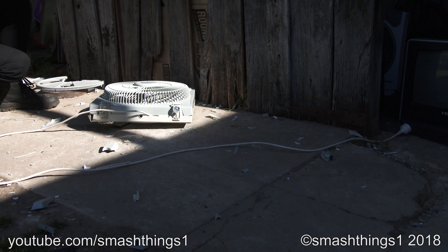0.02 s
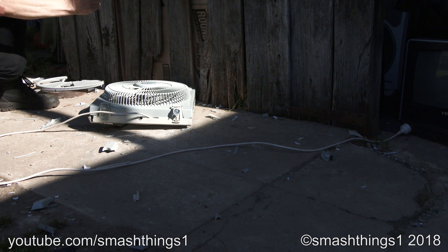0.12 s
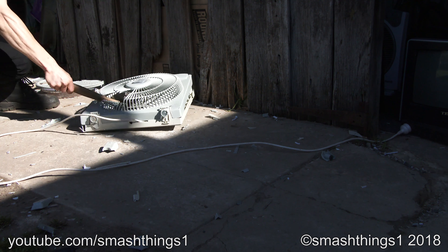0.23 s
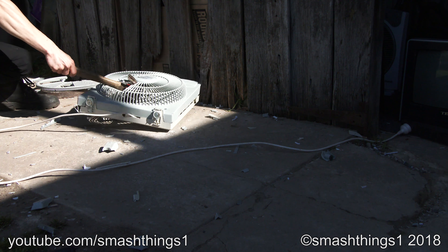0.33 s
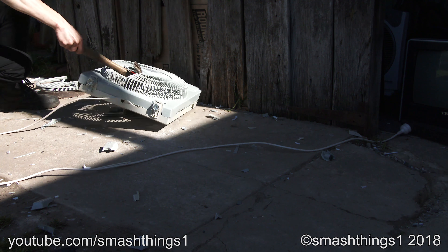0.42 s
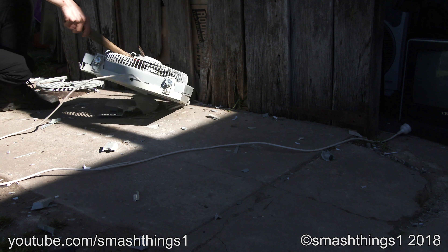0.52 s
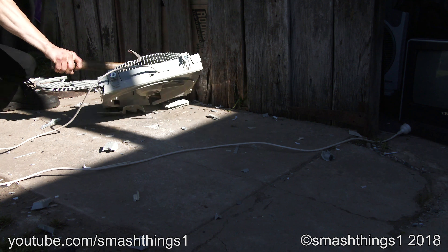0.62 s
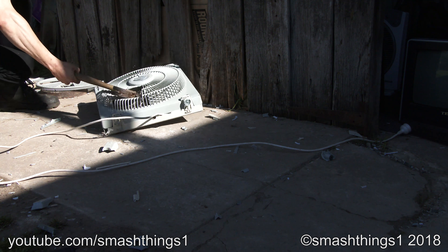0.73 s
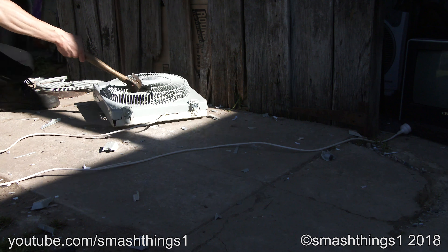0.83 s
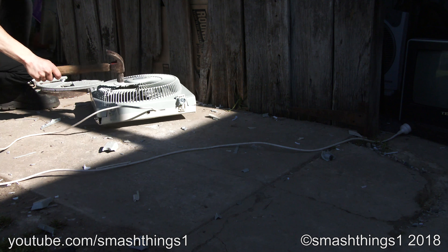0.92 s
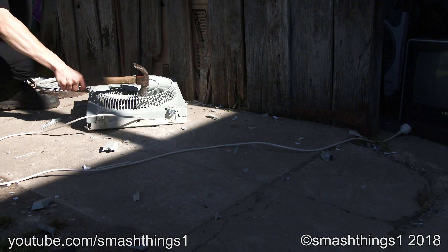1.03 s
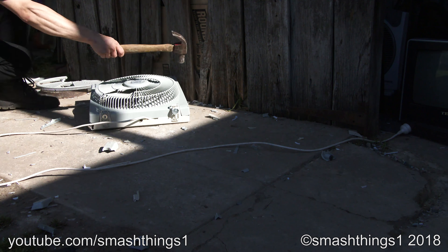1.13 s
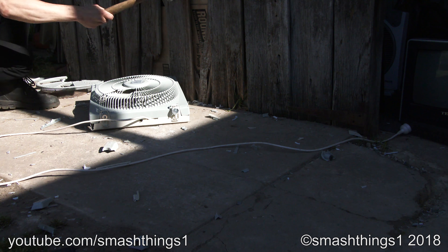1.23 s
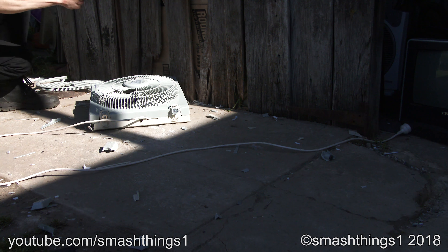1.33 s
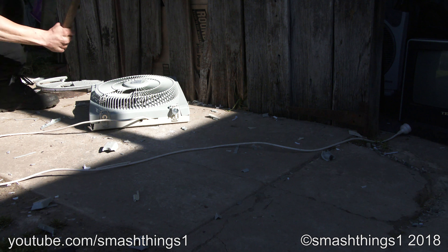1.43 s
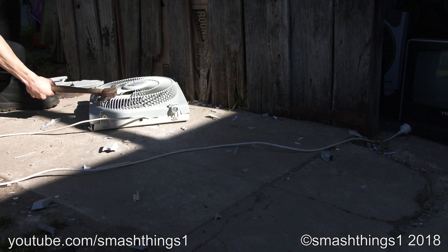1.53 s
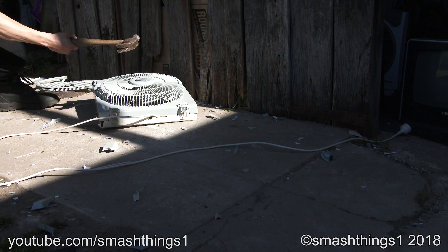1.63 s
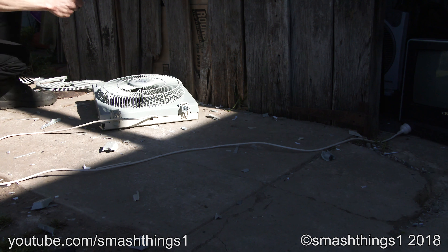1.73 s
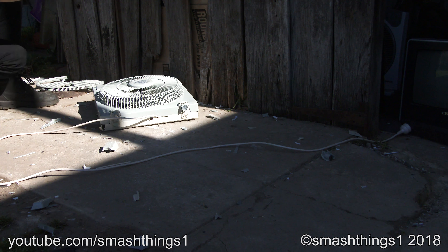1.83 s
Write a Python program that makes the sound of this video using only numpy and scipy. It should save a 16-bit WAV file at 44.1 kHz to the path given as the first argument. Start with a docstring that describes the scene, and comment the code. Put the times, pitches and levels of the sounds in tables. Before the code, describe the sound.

A hammer smashes a plastic box fan on concrete outdoors. Faint bird whistles and soft handling bumps precede a bright, splintering crack at 0.25 s. Loose grille chatters, then hard hollow knocks cluster at 0.68-0.83 s as the case drops. Rattling and lighter knocks follow around 0.9-1.2 s, then near quiet. A second, duller blow lands at 1.55 s, with clacks and ticks fading. Close microphone, short yard reflections.

```python
"""On concrete beside a wooden fence, a claw hammer smashes a plastic box fan.
The first blow cracks the grille; the fan is lifted on the hammer, drops back, and rattles as the
claw pulls free; then a second blow lands. Loose plastic ticks and chatters in between.
Enveloped noise, coloured and sent through case resonances, makes the contacts; struck panels add
short sines. Wavering sines whistle as a distant bird, and coloured noise is the outdoor air."""
import sys
import numpy as np
from scipy import signal
from scipy.fft import rfft, irfft, next_fast_len
from scipy.io import wavfile

SR = 44100
rng = np.random.default_rng(int(sys.argv[2]) if len(sys.argv) > 2 else 0)


def unload_wav(signal):
    """Save mono or channel-first audio to the path in sys.argv[1] as 16-bit WAV at rate SR, clipped to [-1, 1]."""
    wavfile.write(
        sys.argv[1],
        SR,
        np.round(np.clip(np.atleast_2d(signal).T, -1, 1) * 32767).astype(np.int16),
    )


N = 81585
TIME = np.arange(N) / SR  # seconds

ATTACK_S, GRAIN_DB = 0.00078, 4  # rise time constant of a burst; scale of uneven grain strength
SHUDDER_S, BUZZ_S = 0.024, 0.038  # decays of the shell's shudder and of the buzzing grille
SHELL_LOW_HZ = 110  # the light shell radiates little below this


def from_db(db):
    """Logarithmic level: decibels become an amplitude gain."""
    return 10 ** (np.asarray(db) / 20)


def rms_one(x):
    """Normalised power: scale to unit rms."""
    return x / np.sqrt(np.mean(x ** 2) + 1e-20)


def unit_energy(x):
    """Normalised energy: scale the sum of squares to one."""
    return x / np.sqrt(np.sum(x ** 2) + 1e-20)


def cut(x, hz, kind):
    """Second-order filtering: a gentle low- or high-pass."""
    return signal.sosfilt(signal.butter(2, min(hz, .45 * SR), kind, fs=SR, output="sos"), x)


def colour(x, spectrum):
    """Minimum-phase filtering: impose a spectrum causally; white noise keeps its level."""
    size = 2 * next_fast_len(N)
    hz, db = np.transpose(spectrum)
    bin_hz = np.arange(size // 2 + 1) * SR / size
    gain = rms_one(from_db(np.interp(np.log(bin_hz + 1), np.log(hz), db)))
    # folding the cepstrum onto positive time makes the response causal
    cepstrum = irfft(np.log(gain))[:size // 2]
    response = np.exp(2 * rfft(cepstrum, size) - cepstrum[0])
    return irfft(rfft(x, size) * response)[..., :N]


def grains():
    """Granular fracture: dense tiny breaks and slips of uneven size."""
    strength_db = GRAIN_DB * np.minimum(rng.exponential(1, N), 4)
    return rms_one(rng.standard_normal(N) * from_db(strength_db))


def even_grains():
    """Broadband excitation: noise whose strength is evened out over pitch, as in a broad impact."""
    x = rng.standard_normal(N)
    for _ in range(6):
        z = signal.stft(x, nperseg=512)[2]
        x = signal.istft(z / (np.abs(z) + 1e-12))[1][:N]
    return rms_one(x)


def bursts(times, levels_db, decays):
    """Exponential decay: bursts with a sharp attack and their own decays, summed in power."""
    power = np.zeros(N)
    for s, db, decay in np.broadcast(times, levels_db, decays):
        start = int(np.clip(s * SR, 0, N - 1))
        t = TIME[:min(N - start, SR // 2)]
        envelope = from_db(db) * (1 - np.exp(-t / ATTACK_S)) * np.exp(-t / decay)
        power[start:start + len(t)] += envelope ** 2
    return np.sqrt(power)


def contacts(times, levels_db, decays, shudder_db):
    """Two-stage decay: the force of each contact dies fast, over a weaker, longer shudder."""
    return np.hypot(bursts(times, levels_db, decays), bursts(times, levels_db + shudder_db, SHUDDER_S))


def delayed(x, s):
    """Time delay: the same sound, s seconds later."""
    return np.interp(TIME - s, TIME, x, left=0)


# spectrum of the outdoor air: frequency_hz [Hz], density_db [relative dB per Hz]
AIR_SPECTRUM = [(20, -11), (130, 5), (300, -1), (700, -8.5), (2200, -7), (5000, -15), (16000, -27.5)]
AIR_DB = -75.5


def air():
    """Partly coherent noise field: quiet outdoor background, nearly the same on both sides."""
    mid, side = colour(rng.standard_normal((2, N)), AIR_SPECTRUM)
    return from_db(AIR_DB) * (mid + .3 * side * np.array([[1], [-1]]))


# distant bird whistles: start_s [s], length_s [s], pitch_hz [Hz], level_db [dB]
BIRD_WHISTLES = [(-.02, .16, 2121, -70), (.095, .16, 3122, -72), (.12, .14, 3780, -80),
                 (.19, .09, 2326, -69), (1.23, .33, 2326, -80)]
BIRD_WAVER, BIRD_FLUTTER_DB = .007, 2  # rms share of the pitch; rms level


def bird():
    """Multipath modulation: scattered paths make soft, far whistles waver and flutter."""
    out = np.zeros(N)
    for start_s, length_s, pitch_hz, level_db in BIRD_WHISTLES:
        waver, flutter = rms_one(cut(rng.standard_normal((2, N)), 52, "low"))
        progress = np.clip((TIME - start_s) / length_s, 0, 1)
        swell = np.sqrt(np.abs(np.sin(np.pi * progress ** .5)))
        phase = 2 * np.pi * np.cumsum(pitch_hz * (1 + BIRD_WAVER * waver)) / SR
        out += from_db(level_db + BIRD_FLUTTER_DB * flutter) * swell * np.sin(phase)
    return out


FENCE_SIDE_DB, FENCE_DECAY_S, FENCE_TOP_HZ = -12.5, 0.0023, 4530  # level before the low-pass


def fence():
    """Early scattering: a short impulse response that the fence sends sideways."""
    scatter = unit_energy(even_grains() * TIME * np.exp(-TIME / FENCE_DECAY_S))
    return from_db(FENCE_SIDE_DB) * cut(scatter, FENCE_TOP_HZ, "low")


YARD_DB, YARD_T60_S, YARD_TOP_HZ = -19, 0.43, 10900  # level is for both channels together
YARD_TREBLE_DB, YARD_TREBLE_T60_S = -6, 0.48
YARD_WIDTH, PAN_DB = 0.21, 0.35  # side share of the tail; gain on the first channel, loss on the second


def yard_tail():
    """Diffuse reverberation: decaying noise with a soft onset and a weaker treble."""
    noise = rng.standard_normal((2, N))
    low = cut(noise, 3300, "low") * from_db(-60 * TIME / YARD_T60_S)
    treble = cut(noise[::-1], 2000, "high") * from_db(-60 * TIME / YARD_TREBLE_T60_S)
    tail = cut(low + from_db(YARD_TREBLE_DB) * treble, YARD_TOP_HZ, "low")
    return from_db(YARD_DB) * unit_energy(tail * (1 - np.exp(-TIME / 0.0049)))


def yard(x):
    """Convolution with impulse responses: the fence and a faint tail widen the sound."""
    tail = yard_tail()
    side_response = fence() + YARD_WIDTH * cut(tail[1], FENCE_TOP_HZ, "low")
    mid = x + signal.fftconvolve(x, tail[0])[:N]
    side = signal.fftconvolve(x, side_response)[:N]
    side = cut(cut(side, 220, "high"), 6000, "low")
    return np.array([(mid + side) * from_db(PAN_DB), (mid - side) * from_db(-PAN_DB)])


# soft handling bumps: start_s [s], level_db [dB]
HANDLING_BUMPS = [(0.042, -48), (0.145, -45.5), (0.185, -45.5)]
# spectrum of clacks and bumps: frequency_hz [Hz], density_db [relative dB per Hz]
CLACK_SPECTRUM = [(80, -35), (280, -19), (550, -2.5), (1100, -5), (1900, -8), (4000, -16.5), (12000, -31.5)]
BUMP_DECAY_S, BUMP_TOP_HZ = .008, 1950


def bumps():
    """Soft contact: handling before the first blow excites little treble, so the bumps are dull."""
    start_s, level_db = np.transpose(HANDLING_BUMPS)
    bump = colour(bursts(start_s, level_db, BUMP_DECAY_S) * even_grains(), CLACK_SPECTRUM)
    return cut(cut(bump, BUMP_TOP_HZ, "low"), BUMP_TOP_HZ, "low")


# chatter of the loose grille as the fan moves: start_s [s], level_db [dB], interpolated between rows
CHATTER_LEVELS = [(0, -72), (.23, -70.5), (.29, -39), (.40, -56.5), (.47, -60.5), (.56, -67.5),
                  (.65, -57.5), (.80, -97), (.92, -55), (.99, -61.5), (1.09, -34), (1.19, -80.5),
                  (1.34, -88), (1.54, -88.5), (1.62, -74), (1.75, -49.5), (1.80, -71.5), (1.85, -59)]
CHATTER_PER_S = 500  # mean rate of taps


def chatter():
    """Random impulse train: small taps of the loose grille with chance times, signs and sizes."""
    hits = rng.random(N) < CHATTER_PER_S / SR
    strength_db = 0.93 * np.minimum(rng.exponential(1, N), 3)
    taps = hits * rng.choice([-1, 1], N) * from_db(strength_db)
    return rms_one(taps) * from_db(np.interp(TIME, *np.transpose(CHATTER_LEVELS)))


# loose plastic clacks: start_s [s], body_db [dB], tick_db [dB]
LOOSE_CLACKS = [(.061, -56, -67.5), (0.309, -33.5, -51), (0.363, -37, -44.5), (0.392, -53.5, -35.5),
                (0.398, -38.5, -30.5), (0.411, -37, -43), (0.469, -67, -58), (0.5, -53, -54),
                (0.594, -49, -62), (0.613, -44.5, -70), (0.634, -38.5, -46), (0.666, -40.5, -50),
                (0.721, -31, -44), (0.924, -56, -43.5), (0.951, -41.5, -56), (0.998, -61, -44),
                (1.023, -40.5, -39), (1.054, -55, -38.5), (1.068, -41, -42), (1.105, -35, -57),
                (1.141, -39.5, -38), (1.173, -42, -65), (1.224, -48.5, -71), (1.297, -57.5, -62.5),
                (1.38, -86.5, -69), (1.472, -78, -67), (1.592, -27, -45), (1.654, -66, -43),
                (1.764, -40.5, -63), (1.767, -63.5, -45), (1.831, -61, -50)]
# spectrum of the plastic tick: frequency_hz [Hz], density_db [relative dB per Hz]
TICK_SPECTRUM = [(60, -39), (500, -14.5), (3500, 2), (8000, -2.5), (16000, -13.5)]
CLACK_DECAY_S, TICK_DECAY_S = 0.0061, 0.0068
TICK_BUZZ_DB, CHATTER_CRACK_DB = -22.5, -14  # buzz relative to the tick; share of chatter heard as ticks


def rattle():
    """Repeated light impact: clacks, each a small body sound and a tick, over random chatter."""
    start_s, body_db, tick_db = np.transpose(LOOSE_CLACKS)
    loose = chatter()
    body = contacts(start_s, body_db, CLACK_DECAY_S, shudder_db=-13.5) * even_grains() + loose
    tick_force = bursts(start_s, tick_db, TICK_DECAY_S)
    tick_buzz = bursts(start_s, tick_db + TICK_BUZZ_DB, BUZZ_S)
    tick = np.hypot(tick_force, tick_buzz) * grains()
    return colour(body, CLACK_SPECTRUM) + colour(tick + from_db(CHATTER_CRACK_DB) * loose, TICK_SPECTRUM)


# spectra of the hollow case, its hard walls and the low thud:
# frequency_hz [Hz], density_db [relative dB per Hz]
BOOM_SPECTRUM = [(40, -35), (300, -10.5), (480, -2), (680, -1.5), (900, -2), (1400, -11), (4000, -47.5)]
KNOCK_SPECTRUM = [(40, -55.5), (400, -17.5), (750, -3), (1150, 0.5), (1650, -1.5), (2400, -5.5),
                  (4000, -13.5), (16000, -53)]
THUD_SPECTRUM = [(20, -10.5), (70, -3.5), (220, 3.5), (400, -14), (2000, -45.5)]
PANEL_RING_S, PANEL_BOOM_DB = 0.0065, -5  # decay of a struck panel; boom relative to the panel
SHUDDER_DB = -16.5  # relative to the knock
REBOUND_SHARE = .7  # the case slaps back with this share of the force


def shell(rows, thud_db, rebound_s=None):
    """Impact radiation: a hollow boom, a hard knock and a thud; a rebound repeats the force."""
    start_s, panel_db, _, knock_db, _, decay_s = np.transpose(rows)
    force = [even_grains(), even_grains()]
    if rebound_s:
        force = [rms_one(f + REBOUND_SHARE * delayed(f, rebound_s)) for f in force]
    boom_force = contacts(start_s, panel_db + PANEL_BOOM_DB, decay_s, shudder_db=-13) * force[0]
    knock_force = contacts(start_s, knock_db, decay_s, SHUDDER_DB) * force[1]
    thud_force = bursts(start_s, panel_db + thud_db, PANEL_RING_S) * even_grains()
    boom_and_knock = colour(boom_force, BOOM_SPECTRUM) + colour(knock_force, KNOCK_SPECTRUM)
    return colour(thud_force, THUD_SPECTRUM) + cut(boom_and_knock, SHELL_LOW_HZ, "high")


# hammer blows, two rows each, cracking the grille, then driving the case onto the ground:
# start_s [s], panel_db [dB], pitch_hz [Hz], knock_db [dB], crack_db [dB], decay_s [s]
HAMMER_BLOWS = [(0.2485, -22, 491, -24.5, -15, 0.0064), (0.2584, -21.5, 806, -11, -14.5, 0.0051),
                (1.5484, -25, 900, -24, -18, 0.0093), (1.5589, -20, 524, -19.5, -23.5, 0.011)]
# the case and grille hit the concrete or snap off the claw, each time on another panel:
# start_s [s], panel_db [dB], pitch_hz [Hz], knock_db [dB], crack_db [dB], decay_s [s]
CASE_KNOCKS = [(0.6755, -47, 360, -30.5, -25, 0.016), (0.6827, -21, 1297, -14.5, -19, 0.0043),
               (0.7572, -25, 692, -21, -18.5, 0.009), (0.7605, -13.5, 1074, -12, -27, 0.0019),
               (0.777, -32, 671, -32, -20, 0.0029), (0.8093, -36, 1280, -23, -19, 0.012),
               (0.8125, -21.5, 623, -23, -35, 0.004), (.825, -29, 1092, -42, -31, 0.0056),
               (0.884, -43.5, 260, -61, -69, 0.031), (0.934, -38.5, 606, -55, -47.5, 0.018),
               (1.0385, -28, 1027, -25.5, -30, 0.0042), (1.079, -31, 669, -37.5, -42, 0.0082),
               (1.087, -30.5, 668, -31.5, -26, 0.0072), (1.117, -28.5, 647, -29.5, -59, 0.0039),
               (1.696, -36, 1020, -33, -48, 0.0026), (1.721, -41.5, 920, -42, -50, 0.0052),
               (1.733, -49, 710, -42, -52, 0.0036), (1.746, -52, 660, -55, -73, 0.0065)]


def panels():
    """Damped vibration: each heavy contact sets one panel ringing briefly at its own pitch."""
    out = np.zeros(N)
    for start_s, panel_db, pitch_hz, *_ in HAMMER_BLOWS + CASE_KNOCKS:
        tone = np.sin(2 * np.pi * pitch_hz * (TIME - start_s))
        out += bursts([start_s], panel_db, PANEL_RING_S) * tone
    return out


# spectra of the cracking plastic and of the grille buzzing on:
# frequency_hz [Hz], density_db [relative dB per Hz]
CRACK_SPECTRUM = [(50, -42.5), (200, -26), (1000, -9.5), (2500, -1.5), (4300, 2.5), (8500, -3.5),
                  (16000, -9.5)]
BUZZ_SPECTRUM = [(50, -40.5), (300, -17), (2500, -1.5), (4300, 0.5), (9000, -8.5), (16000, -16.5)]
BUZZ_DB = -18.5  # relative to the crack
BLOW_THUD_DB, KNOCK_THUD_DB = -21, -30.5  # relative to the panel
FIRST_REBOUND_S, SECOND_REBOUND_S = .0099, .0075  # delay of the slap back in each blow


def impacts():
    """Impact and fracture: the shell's body, a ringing panel, and a crack that leaves a duller buzz."""
    start_s, _, _, _, crack_db, decay_s = np.transpose(HAMMER_BLOWS + CASE_KNOCKS)
    first_blow = shell(HAMMER_BLOWS[:2], BLOW_THUD_DB, FIRST_REBOUND_S)
    second_blow = shell(HAMMER_BLOWS[2:], BLOW_THUD_DB, SECOND_REBOUND_S)
    body = first_blow + second_blow + shell(CASE_KNOCKS, KNOCK_THUD_DB)
    crack = colour(bursts(start_s, crack_db, decay_s) * grains(), CRACK_SPECTRUM)
    buzz = colour(bursts(start_s, crack_db + BUZZ_DB, BUZZ_S) * grains(), BUZZ_SPECTRUM)
    return body + cut(panels() + crack + buzz, SHELL_LOW_HZ, "high")


SPLINTER_DB, SPLINTER_HZ = 1, 8800  # relative to the crack, before the high-pass; its corner


def splinters():
    """Brittle fracture: under the hammer head the grille bars snap with a very bright crackle."""
    start_s, _, _, _, crack_db, decay_s = np.transpose(HAMMER_BLOWS)
    return cut(bursts(start_s, crack_db + SPLINTER_DB, decay_s) * grains(), SPLINTER_HZ, "high")


# resonances of the case: pitch_hz [Hz], width_hz [Hz], level_db [dB over the broad response]
CASE_RESONANCES = [(379.5, 16, -4.5), (521, 32, -9), (667.4, 62, 2.5), (786, 19, -9.5), (923, 90, -9.5),
                   (1125, 89, -8), (1522, 39, -0.5), (1710, 56, -1.5), (2090, 34, -7), (2694, 23, -11)]


def case(x):
    """Modal resonance: the plastic shell adds its short resonances to the direct sound."""
    out = x.copy()
    for pitch_hz, width_hz, level_db in CASE_RESONANCES:
        radius = np.exp(-np.pi * width_hz / SR)
        poles = [1, -2 * radius * np.cos(2 * np.pi * pitch_hz / SR), radius ** 2]
        gain = from_db(level_db) * (1 - radius ** 2) / 2
        out += gain * signal.lfilter([1, 0, -1], poles, x)
    return from_db(-2) * out


def fan():
    """Superposition: all contacts sound together through the plastic shell."""
    return case(impacts() + splinters() + cut(rattle() + bumps(), SHELL_LOW_HZ, "high"))


def scene():
    """Superposition of sources: the fan in the yard, the bird and the air."""
    return yard(fan()) + bird() + air()


CUTOFF_HZ = 15800


def record(dry):
    """Saturation and band-limiting: peaks are rounded and the top is cut."""
    top = .5  # amplitude the rounded peaks approach
    rounded = top * np.tanh(dry / top)
    return signal.sosfilt(signal.ellip(10, .1, 80, CUTOFF_HZ, fs=SR, output="sos"), rounded)


dry = scene()
out = record(dry)
unload_wav(out)
```